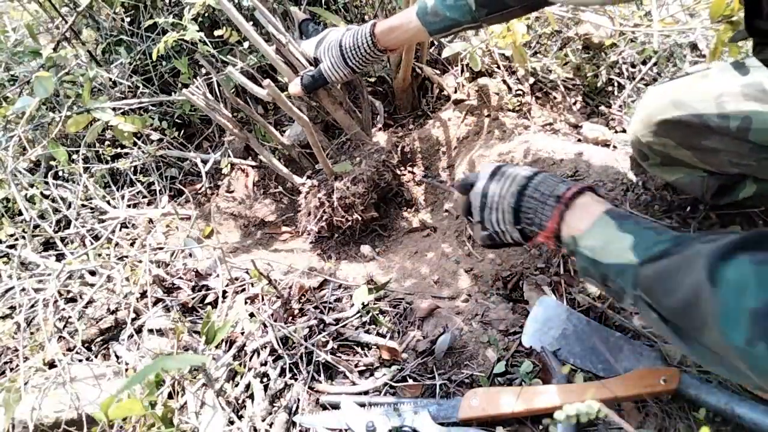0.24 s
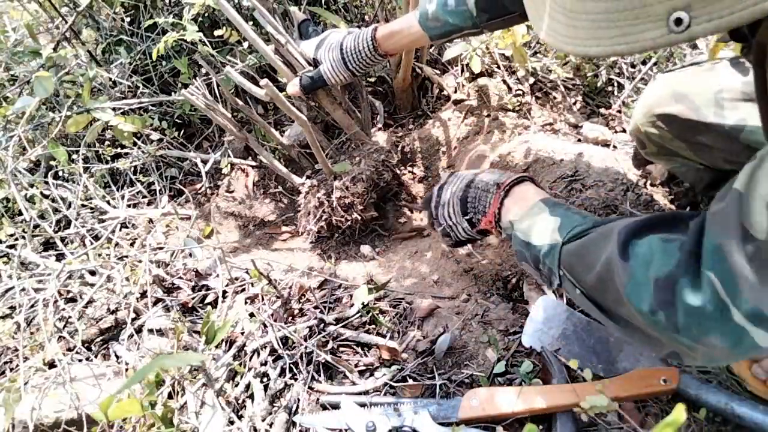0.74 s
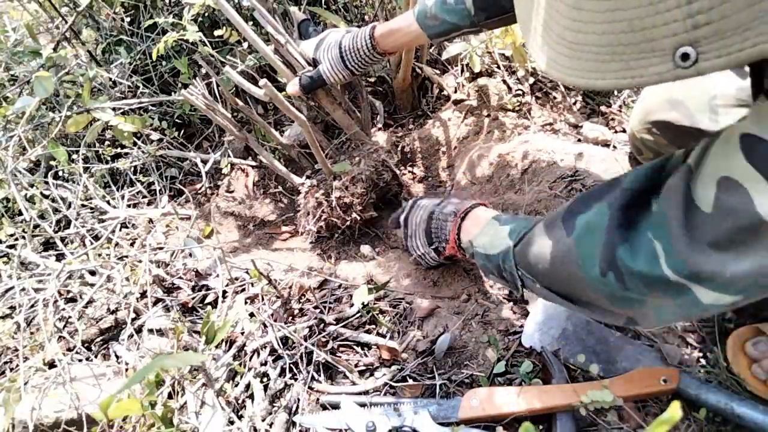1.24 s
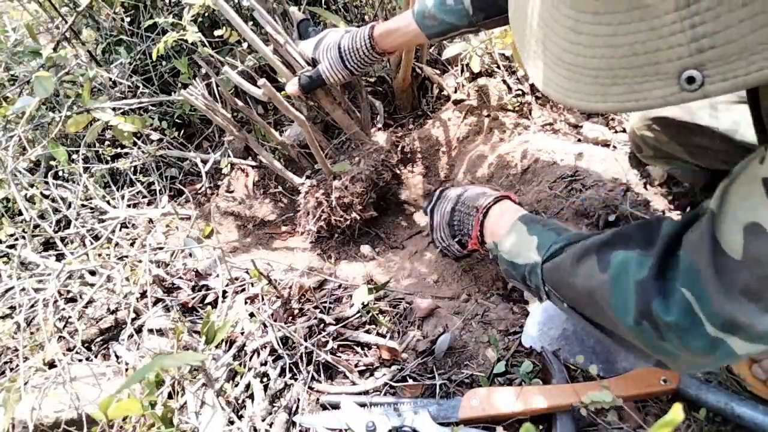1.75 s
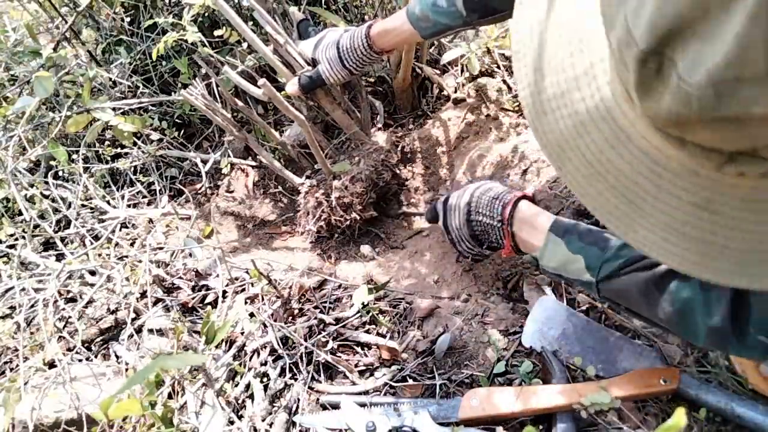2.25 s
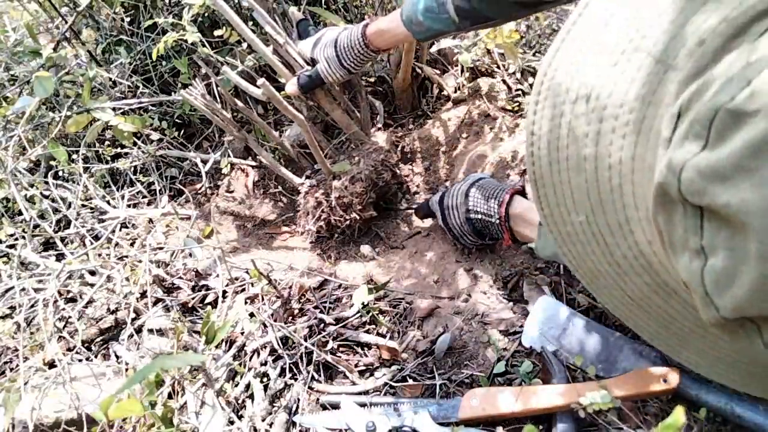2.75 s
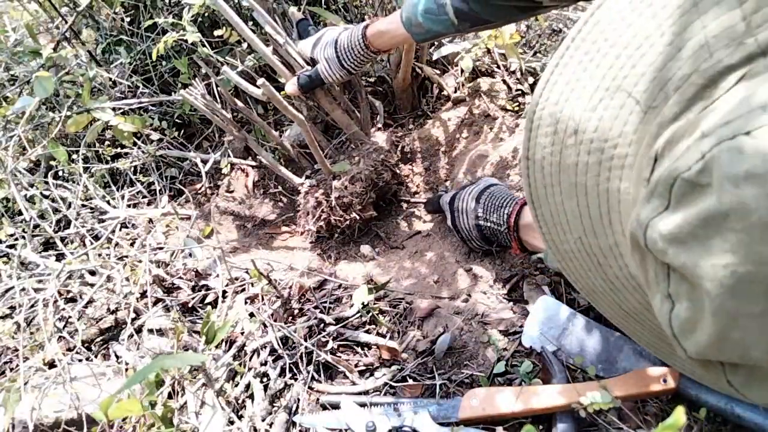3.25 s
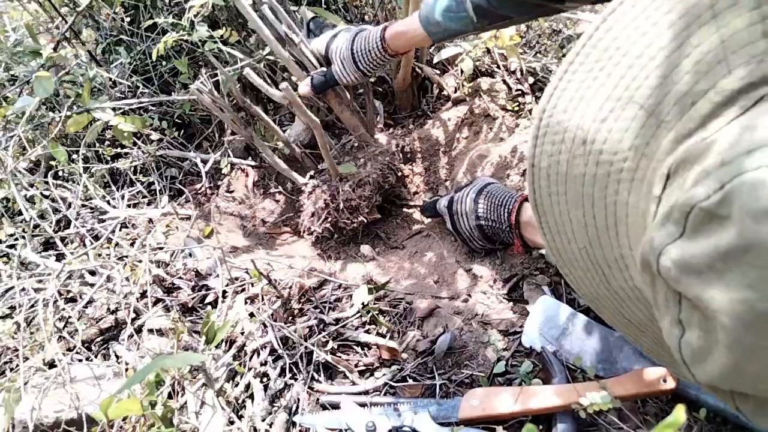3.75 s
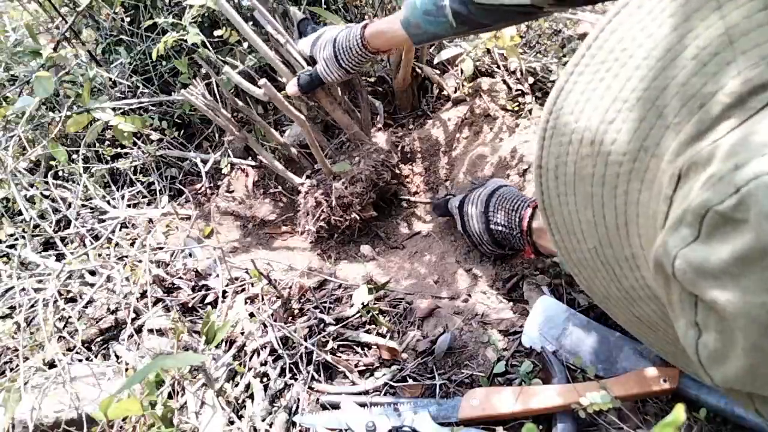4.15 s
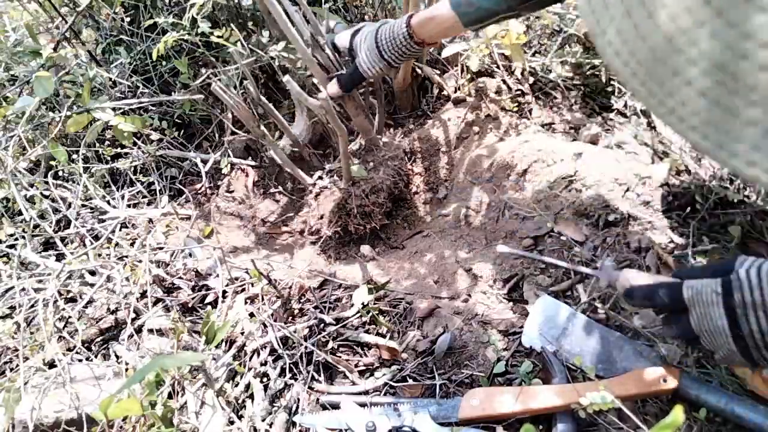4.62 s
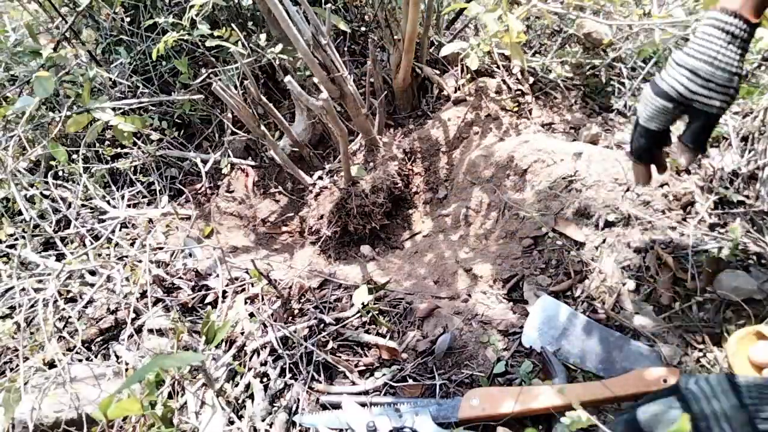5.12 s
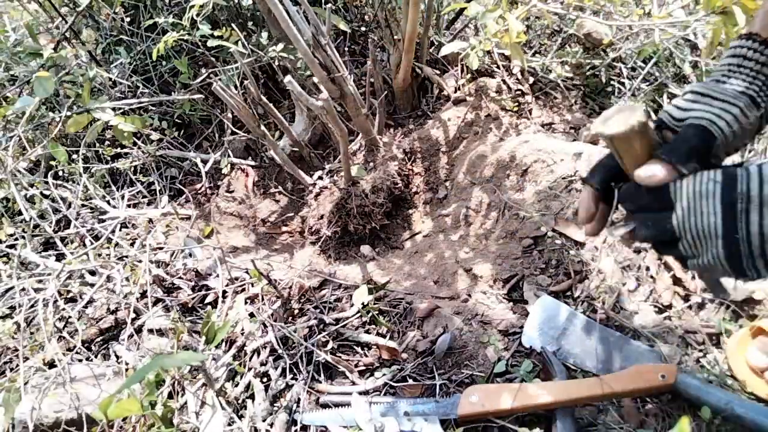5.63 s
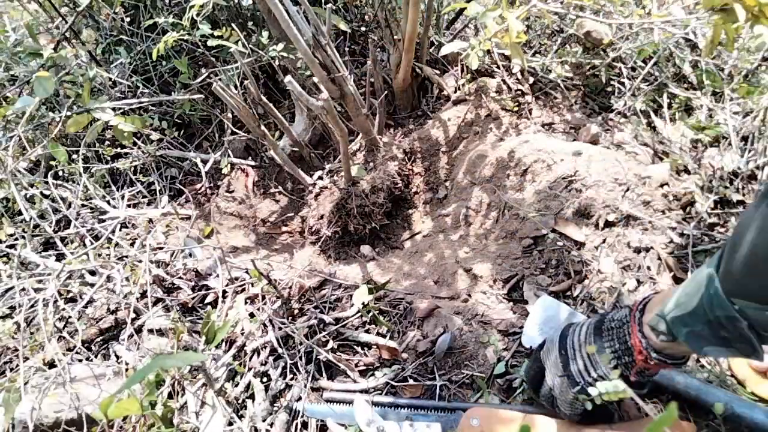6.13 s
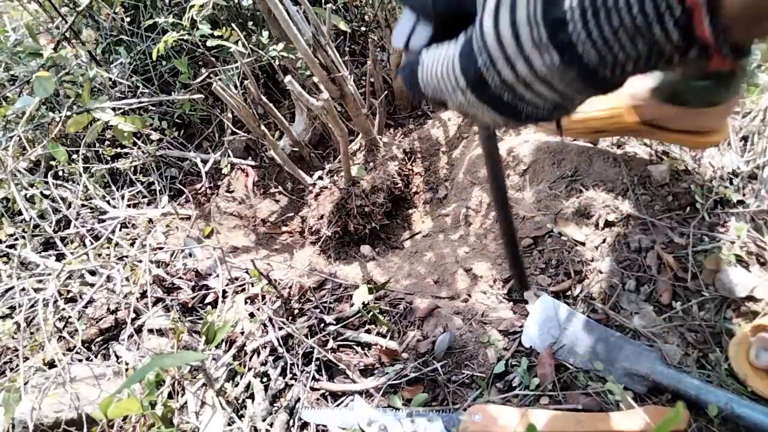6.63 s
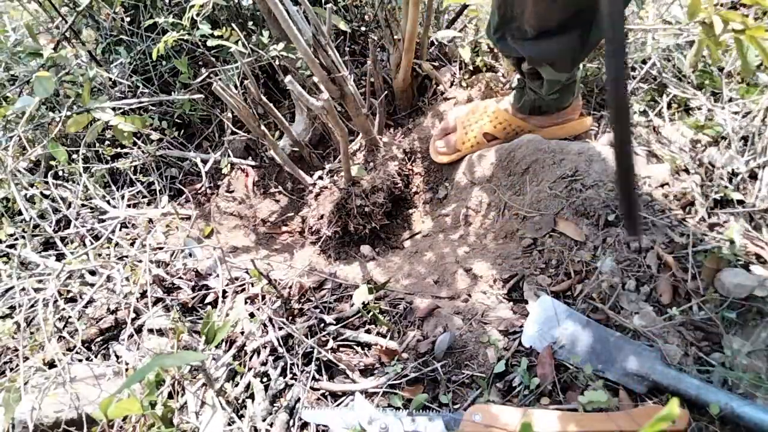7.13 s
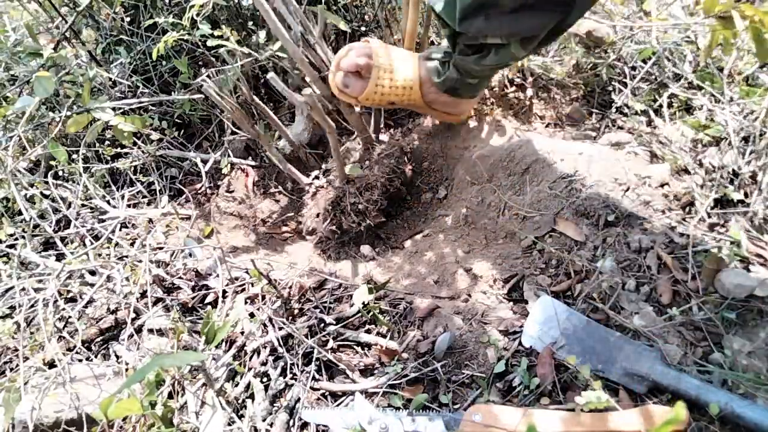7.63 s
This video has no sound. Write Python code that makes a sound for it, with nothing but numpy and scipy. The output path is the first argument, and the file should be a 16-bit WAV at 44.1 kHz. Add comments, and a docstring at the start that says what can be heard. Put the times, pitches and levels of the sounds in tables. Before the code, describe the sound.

Close gritty scrapes of a metal point in dry earth, a light metallic drop, wind bumps, crackling leaves, one bright steel clang, then underfoot crunches.

```python
"""A thin steel pick in a gloved hand scrapes dry soil from shrub roots; it lands and a steel bar clangs once.
Scrapes and crunches are grainy noise under pressure curves, the scrapes coloured by the pick's damped modes.
Snaps are ticks with a rattle, thumps are falling chirps with crumbs, dragged tools are rung by friction noise,
and landing steel is decaying sines. Leaves rustle, wind and single eddies push a close microphone, faint air hisses."""
import sys
import numpy as np
from scipy import signal
from scipy.io import wavfile
from scipy.ndimage import uniform_filter1d

SR = 44100
rng = np.random.default_rng(int(sys.argv[2]) if len(sys.argv) > 2 else 0)


def persist_wave(psi):
    """Save psi, clipped to +-1, as 16-bit WAV."""
    counts = np.round(np.clip(psi, -1, 1) * 32767).astype(np.int16)
    wavfile.write(sys.argv[1], SR, np.atleast_2d(counts).T)


N = 347508  # samples

# strokes of the pick: deepest_bite_s, grinding_level_db, dig_in_s, drag_out_s
STROKES = [(.396, -54, 0.11, 0.025), (0.428, -53.5, 0.014, 0.031), (0.519, -46.5, 0.024, 0.027),
           (0.576, -55, 0.058, 0.1), (.816, -59.5, 0.023, 0.044), (0.913, -62, 0.037, 0.085),
           (1.013, -47.5, 0.062, 0.026), (1.284, -50.5, 0.033, 0.067), (1.378, -51, .012, 0.028),
           (1.578, -63, .015, 0.065), (1.666, -55.5, 0.032, 0.053), (1.73, -59, 0.073, 0.065),
           (1.95, -76, .05, .04), (2.025, -48, 0.046, 0.016), (2.049, -47, 0.045, 0.057),
           (2.1, -66, 0.04, 0.16), (2.33, -67, 0.16, 0.042), (2.434, -52, 0.058, 0.031),
           (2.469, -54, 0.013, 0.081), (2.752, -66.5, 0.056, .02), (2.832, -54, .033, 0.072),
           (3.071, -62.5, 0.03, .035), (3.198, -58.5, 0.066, 0.051), (3.27, -69.5, 0.056, 0.064),
           (3.552, -62.5, 0.027, .02), (3.802, -68, .024, 0.024), (3.907, -65.5, 0.011, 0.036),
           (4.035, -71, .02, .015)]
# bending modes of the pick gripped in the glove: pitch_hz, width_hz, mean height over the soil noise_db
GRIPPED_PICK = [(1645, 68, 14), (3667, 270, 18), (5334, 260, 16), (7100, 78, 3), (9800, 250, 1),
                (11070, 210, 9.5), (14900, 430, 19.5)]
# spectrum of breaking dry litter: pitch_hz, relative level_db per Hz
LITTER = [(880, -48), (1500, -3.5), (1810, -11), (2590, -13.5), (2940, -10.5), (6310, -6.5), (8400, 5.5),
          (11500, -6.5), (15200, -2.5), (16000, -1.5)]


def gain_of(db):
    """Decibels to amplitude."""
    return 10 ** (np.asarray(db) / 20)


def evened(x):
    """Scale to rms 1."""
    return x / np.sqrt(np.mean(x ** 2) + 1e-20)


def add(mix, s, sound):
    """Lay a sound into the mix at a time in seconds, cut at the end."""
    part = mix[round(s * SR):][:len(sound)]
    part += sound[:len(part)]


def along(rows):
    """Columns of a table as curves over the whole length."""
    s, *columns = np.transpose(rows)
    return [np.interp(np.arange(N) / SR, s, column) for column in columns]


def slow_swing(span):
    """Random drift of rms 1: noise averaged twice over a span in samples."""
    once = uniform_filter1d(rng.standard_normal(N), span)
    return evened(uniform_filter1d(once, span))


def colour(points):
    """Minimum-phase filter taps of energy 1 for a spectrum."""
    f, db = np.transpose(points)
    hz = abs(np.fft.fftfreq(8192, 1 / SR))
    log_gain = np.interp(np.log(hz + 1), np.log(f + 1), db) * np.log(10) / 20
    response = np.exp(np.conj(signal.hilbert(log_gain)))
    taps = np.fft.ifft(response).real[:4096]
    return taps / np.linalg.norm(taps)


def through(x, taps):
    """Filter and keep the length."""
    return signal.oaconvolve(x, taps)[:len(x)]


def dull(x, hz):
    """The soft low part of a contact, from 230 Hz up to hz; rms 1 for white input of rms 1."""
    taps = signal.lfilter(*signal.butter(1, [230, hz], "band", fs=SR), np.eye(1, 1024)[0])
    return through(x, taps / np.linalg.norm(taps))


def grit(per_s, spread_db, hiss):
    """Small breaks of very uneven size over a fine hiss; each is a short burst in one of five bands."""
    out = np.sqrt(hiss) * rng.standard_normal(N)
    edges_hz = [(200, 20000), (200, 2500), (1500, 5500), (4000, 9000), (7000, 20000)]
    burst_s = 0.0014  # decay of burst power to 1/e
    for edge in edges_hz:
        breaks = rng.random(N) < per_s / SR  # per_s holds for each band
        size = gain_of(spread_db * np.minimum(rng.exponential(1, N), 4)) * breaks
        power = signal.lfilter([1], [1, -np.exp(-1 / (burst_s * SR))], size ** 2)
        noise = signal.lfilter(*signal.butter(1, edge, "band", fs=SR), rng.standard_normal(N))
        out += 0.66 * noise * np.sqrt(power / power.mean())
    return evened(out)


def pressure(s, db, rise, fall, grains):
    """Start time and the grains under one contact that presses in and lets go."""
    fade_db, fade_curve = 24, 1.145  # fade_db down one rise or fall time from the peak
    reach = 3  # the contact lasts this many rise and fall times
    t = np.arange(-reach * rise, reach * fall, 1 / SR)
    away = abs(t) / np.where(t < 0, rise, fall)
    gain = signal.windows.tukey(len(t), .06) * gain_of(db - fade_db * away ** fade_curve)
    return s + t[0], gain * grains[round((s + t[0]) * SR):][:len(t)]


def rustle():
    """Leaves and cloth stir as fine crackle in short, restless fits."""
    # stirring: time_s, level_db before the fits and the added dull part
    stirring = [(0.0, -61.5), (0.31, -69.5), (0.61, -77), (1.4, -81), (2.02, -76), (2.2, -68.5),
                (2.37, -73), (2.55, -68), (2.87, -86.5), (3.42, -87.5), (4.1, -80.5), (4.33, -66.5),
                (4.65, -66), (4.8, -73.5), (4.9, -64.5), (5.48, -54), (5.75, -57), (5.9, -62), (6.32, -56),
                (7.88, -56.5)]
    stir_db, stir_s = 2., 0.039  # rms depth, averaging span of the fits
    grains = grit(40, 2.46, 0.86)
    fits = slow_swing(round(stir_s * SR))
    crackle = gain_of(along(stirring)[0] + stir_db * fits) * grains
    return through(crackle, colour(LITTER)) + dull(gain_of(-11.5) * crackle, 3950)


def wind():
    """Lumpy low pressure swings at the microphone port, reaching higher as they grow."""
    # wind on the microphone: time_s, level_db
    strength = [(0.0, -50), (0.09, -50.5), (0.31, -53.5), (0.6, -59), (1.03, -67.5), (1.84, -66),
                (2.57, -66.5), (3.29, -73), (4.17, -69.5), (4.85, -65), (5.05, -46.5), (5.2, -44),
                (5.4, -51.5), (6.15, -45.5), (6.43, -54), (6.63, -51), (6.82, -61.5), (7.53, -68.5),
                (7.88, -58)]
    # spectrum of strong gusts: pitch_hz, relative level_db per Hz
    gust = [(12, -26.5), (20, 11), (76, 4.5), (150, -16), (216, -13.5), (340, -36.5), (400, -29.5),
            (520, -50), (880, -120)]
    # spectrum of light air: pitch_hz, relative level_db per Hz
    calm = [(12, -38), (20, -0.5), (41, -6), (81, -25), (200, -26), (260, -54), (440, -120)]
    sway_db, sway_s = 2, 0.1  # slower coming and going: rms depth, averaging span
    lumps = slow_swing(1500)
    sway = slow_swing(round(sway_s * SR))
    push = rng.standard_normal(N) * gain_of(3.25 * lumps + sway_db * sway)
    level_db = along(strength)[0]
    strong = np.clip((level_db + 66) / 22, 0, 1)  # all calm at -66 dB, all gust at -44 dB
    gusty = strong * evened(through(push, colour(gust)))
    light = (1 - strong) * evened(through(push, colour(calm)))
    return gain_of(level_db) * (gusty + light)


def air():
    """Far leaves and microphone hiss: steady coloured noise."""
    # spectrum of the background: pitch_hz, relative level_db per Hz
    background = [(35, -28.5), (60, 1.5), (87, -8), (448, -18), (621, -21.5), (4420, -30), (8710, -31),
                  (16000, -52.5)]
    return gain_of(-78) * through(rng.standard_normal(N), colour(background))


def pick_colour(shake_db):
    """Soil noise with the damped bending modes of the pick standing out of it."""
    # spectrum of grinding soil: pitch_hz, relative level_db per Hz
    soil = [(880, -39.5), (1500, -8), (2800, -9.5), (3730, -12), (6120, -12.5), (7320, 0.5), (16000, -25.5)]
    t = np.arange(2048) / SR
    hz, width, db = np.transpose(GRIPPED_PICK)[:, :, None]
    height = gain_of(db + shake_db[:, None]) * 2 * np.pi * width / SR
    modes = height * np.exp(-np.pi * width * t) * np.cos(2 * np.pi * hz * t)
    direct = np.eye(1, 2048)[0]
    taps = through(direct + modes.sum(0), colour(soil))
    return taps / np.linalg.norm(taps)


def strokes():
    """Grit grinds under the pick; each stroke favours other modes."""
    out, low, grains = np.zeros(N), np.zeros(N), grit(90, 4.9, 0.17)
    shakes_db = 7.9 * rng.standard_normal((len(STROKES), len(GRIPPED_PICK)))
    for row, shake_db in zip(STROKES, shakes_db):
        s, rasp = pressure(*row, grains)
        add(out, s, signal.oaconvolve(rasp, pick_colour(shake_db)))
        add(low, s, rasp)
    return out + gain_of(-9.5) * dull(low, 1440)


def snaps():
    """Twigs and pebbles give a sharp tick with a short rattle; while the pick works they pass through it."""
    # ticks: start_s, nominal level_db before colouring
    ticks = [(0.4231, -35.5), (0.498, -35.5), (0.5183, -33.5), (0.578, -32.5), (0.8135, -63), (1.1937, -51),
             (1.284, -46), (1.3765, -31), (1.418, -54), (1.6712, -32), (1.736, -39), (1.81, -44),
             (2.0208, -35), (2.0509, -26.5), (2.5282, -54), (2.628, -53.5), (2.849, -48), (2.888, -55),
             (3.199, -37.5), (3.499, -53), (3.9035, -53), (4.384, -43), (4.471, -44), (4.492, -41),
             (4.7363, -34.5), (4.9816, -29), (5.1696, -42), (5.1874, -24.5), (5.209, -22.5), (5.296, -29.5),
             (5.35, -25), (5.457, -27), (5.833, -34), (6.051, -38), (6.114, -29), (6.159, -27.5),
             (6.2879, -17.5), (6.33, -20), (6.405, -21), (6.4629, -11.5), (6.566, -43), (6.6454, -39),
             (6.971, -36), (7.0876, -37), (7.119, -24), (7.1396, -15.5), (7.204, -18), (7.2285, -13),
             (7.323, -32.5), (7.3594, -32), (7.422, -35), (7.441, -25.5), (7.587, -31.5), (7.601, -34),
             (7.6425, -31.5), (7.6904, -30)]
    crack_t60_s, rattle_t60_s, rattle_db = 0.0091, 0.057, -15  # loose bits rattle on after the crack
    crest_db = 9  # assumed peak of noise over its rms
    out, t = np.zeros(N), np.arange(2000) / SR
    shape = gain_of(-60 * t / crack_t60_s) + gain_of(rattle_db - 60 * t / rattle_t60_s)
    for (s, db), noise in zip(ticks, rng.standard_normal((len(ticks), 2000))):
        tick = noise + 3.2 * (t == 0)  # a click on the first sample
        add(out, s, gain_of(db - crest_db) * shape * tick)
    digging = np.arange(N) < (STROKES[-1][0] + STROKES[-1][-1]) * SR
    held = through(out * digging, pick_colour(np.zeros(len(GRIPPED_PICK))))
    loose = through(out * ~digging, colour(LITTER))
    return held + loose + gain_of(-21.5) * dull(out, 3400)


def knocks():
    """Packed soil thumps: a quick falling chirp, with a shorter burst of loose crumbs at the same moment."""
    # thumps of fingers and tools: start_s, nominal level_db before the mix of its parts, lowest pitch_hz
    thumps = [(0.425, -52, 720), (0.774, -54.5, 223), (0.825, -54.5, 500), (0.959, -56.5, 280),
              (1.191, -47, 177), (1.568, -49.5, 218), (1.919, -56, 934), (1.943, -58, 514),
              (2.311, -54, 194), (2.735, -62, 503), (3.066, -62, 513), (3.482, -67, 456), (3.546, -64, 224),
              (3.903, -63, 757), (5.006, -38.5, 388), (5.473, -34.5, 264), (7.076, -47, 1055),
              (7.688, -57, 1100)]
    out, t = np.zeros(N), np.arange(4000) / SR
    for (s, db, hz), noise in zip(thumps, rng.standard_normal((len(thumps), 4000))):
        turns = np.cumsum(hz + 1800 * np.exp(-t / 0.00184)) / SR
        chirp = gain_of(-60 * t / 0.086) * np.sin(2 * np.pi * turns)
        crumbs = gain_of(-60 * t / 0.042) * dull(noise, 670)
        add(out, s, gain_of(db) * (0.47 * chirp + 0.59 * crumbs))
    return out


def crunches():
    """Dry leaves and stalks break in clumps under a hand, tool or foot."""
    # presses: hardest_press_s, bright crunch level_db, press_in_s, let_go_s, dull share_db relative to it
    presses = [(4.494, -57.5, .004, 0.034, -12), (4.737, -51.5, .004, 0.037, -23),
               (4.997, -34.5, 0.01, 0.04, -5), (5.192, -48, 0.041, 0.052, -6),
               (5.356, -47, 0.037, 0.08, -23), (5.457, -30.5, 0.0025, 0.043, -31),
               (5.889, -46.5, 0.043, 0.049, -14.5), (5.95, -59.5, 0.015, 0.016, 2.5),
               (6.178, -52, 0.16, 0.014, -8), (6.284, -47.5, 0.079, 0.16, -35),
               (6.409, -35, 0.0094, 0.089, -38), (6.568, -40, 0.019, 0.04, -44),
               (6.654, -39.5, .015, 0.063, -4.5), (6.7, -48, .01, 0.039, -4),
               (6.744, -46.5, 0.039, 0.024, -2), (6.794, -43.5, 0.037, 0.09, -10.5),
               (6.974, -41.5, 0.032, 0.023, -18), (7.095, -41.5, 0.022, 0.15, -10.5),
               (7.17, -40, 0.076, 0.079, -18)]
    bright, low, grains = np.zeros(N), np.zeros(N), grit(90, 4.84, 0.39)
    for *row, share_db in presses:
        s, crush = pressure(*row, grains)
        add(bright, s, crush)
        add(low, s, gain_of(share_db) * crush)
    return through(bright, colour(LITTER)) + dull(low, 5100)


def steel(modes, blows):
    """Each blow sets all modes ringing as decaying sines of slightly other strengths."""
    out, t = np.zeros(N), np.arange(SR) / SR
    hz, db, t60 = np.transpose(modes)[:, :, None]
    for s, level_db in blows:
        strength_db = db + rng.normal(0, 1.0, db.shape)
        rings = gain_of(strength_db - 60 * t / t60) * np.sin(2 * np.pi * hz * t)
        add(out, s, gain_of(level_db) * rings.sum(0))
    return out


def pick_landing():
    """The pick rings free as it lands, no longer damped by the glove."""
    # modes of the free pick: pitch_hz, mean relative level_db, t60_s
    free_modes = [(1616, 0, .13), (3600, -9, .08), (5373, -6, .04)]
    # blows: start_s, level_db of a mode at 0 dB
    landings = [(5, -40), (5.171, -52.5), (5.296, -63)]
    return steel(free_modes, landings)


def eddies():
    """Single eddies thump the microphone, each a rounded push or pull with its rebound."""
    # thumps: centre_s, peak_db
    swirls = [(5.049, -32.5), (5.099, -35.5), (5.116, -31.5), (5.152, -30), (5.219, -37.5), (5.537, -36.5),
              (5.769, -41), (6.009, -32.5), (6.067, -37.5), (6.168, -36.5), (6.185, -33)]
    out, t = np.zeros(N), np.arange(-1500, 1500) / SR
    for (s, db), (side, size) in zip(swirls, rng.random((len(swirls), 2))):
        u = (t / (0.002 + 0.0019 * size)) ** 2
        swing = (1 - 0.75 * u) * np.exp(-u / 2)
        add(out, s + t[0], np.sign(side - .5) * gain_of(db) * swing)
    return out


def drags():
    """Friction noise rings tools dragged over each other, most strongly near a favoured pitch for each rub."""
    # rubs: start_s, length_s, level_db, favoured pitch_hz
    rubs = [(5.293, 0.039, -64, 3720), (5.861, 0.053, -55.5, 1960), (6.172, 0.015, -46, 4700),
            (6.242, 0.068, -52, 2670), (6.402, 0.0393, -45.5, 3150), (6.551, 0.042, -50, 4850),
            (6.639, 0.03, -48.5, 1400)]
    # modes of the dragged tools: pitch_hz, width_hz, level_db before the favouring
    tools = [(1488, 33, 2.5), (1617, 43, 7), (2346, 26, 8), (2537, 78, 9), (3036, 50, 9), (3860, 70, 11),
             (4600, 90, 1), (5000, 180, 18), (5200, 66, 7)]
    out, t = np.zeros(N), np.arange(2048) / SR
    hz, width, mode_db = np.transpose(tools)[:, :, None]
    rings = np.sqrt(width) * np.exp(-np.pi * width * t) * np.sin(2 * np.pi * hz * t)
    grains = grit(130, 1.8, 0.65)
    for s, length, db, centre_hz in rubs:
        favour_db = mode_db - 13.8 * abs(np.log2(hz / centre_hz))  # dB lost per octave away
        taps = (gain_of(favour_db) * rings).sum(0)
        rub = grains[round(s * SR):][:round(length * SR)]
        rub = rub * signal.windows.tukey(len(rub), .3)
        add(out, s, gain_of(db) * signal.oaconvolve(rub, taps / np.linalg.norm(taps)))
    return out


def bar_clang():
    """The steel bar clangs with many modes, a few of them ringing long."""
    # modes of the bar: pitch_hz, mean relative level_db, t60_s
    bar_modes = [(1798, -25, .5), (2455, -8, .14), (3052, -25, 1.7), (3353, -20, .1), (4455, -11, .13),
                 (5250, -16, .1), (7208, -17, .3), (7815, 0, .11), (8262, -10, .19), (9073, -9, .75),
                 (10497, -7, .23), (11610, -14, .24), (14175, -10, .2), (15525, -17, .12)]
    # blow: start_s, level_db of a mode at 0 dB
    clang = [(6.462, -33.5)]
    return steel(bar_modes, clang)


def scene():
    """Sum of all layers, one channel."""
    soil = strokes() + crunches() + snaps() + knocks()
    metal = drags() + pick_landing() + bar_clang()
    return (soil + metal + rustle() + wind() + eddies() + air())[None]


def record(dry):
    """The band limit: a steep low-pass."""
    edge_hz = 15900
    taps = signal.firwin(511, edge_hz, window=("kaiser", 9), fs=SR)
    return signal.oaconvolve(dry, taps[None], "same")


dry = scene()
out = record(dry)
persist_wave(out)
```